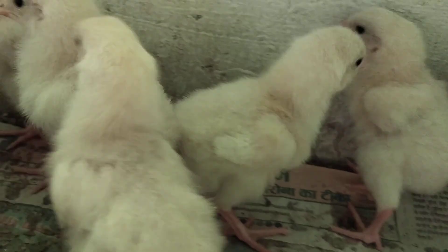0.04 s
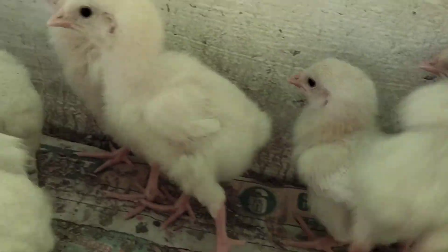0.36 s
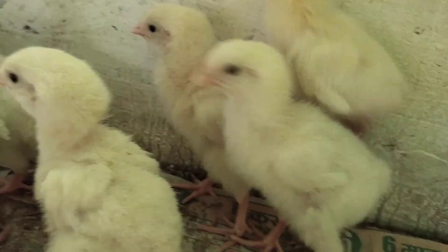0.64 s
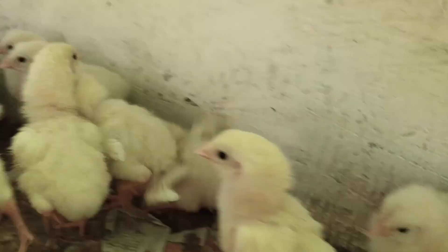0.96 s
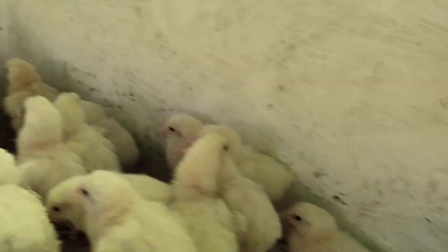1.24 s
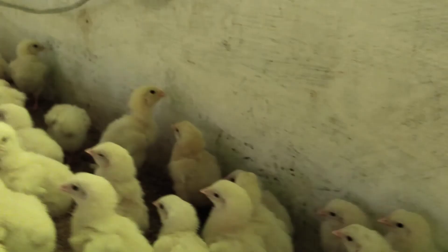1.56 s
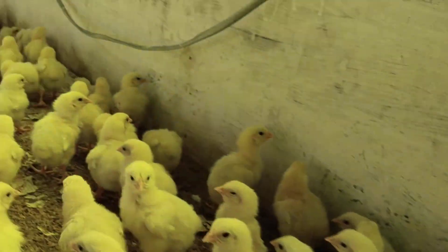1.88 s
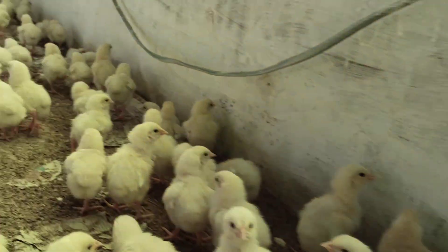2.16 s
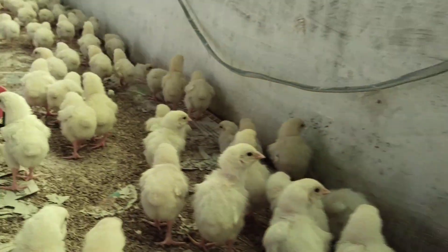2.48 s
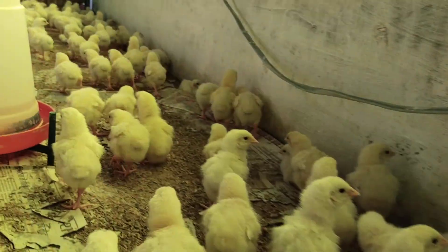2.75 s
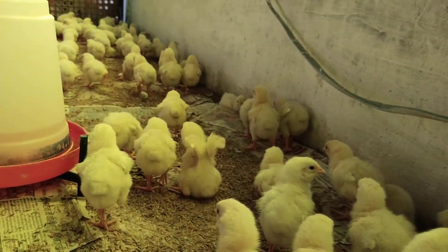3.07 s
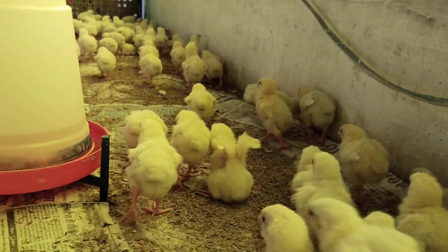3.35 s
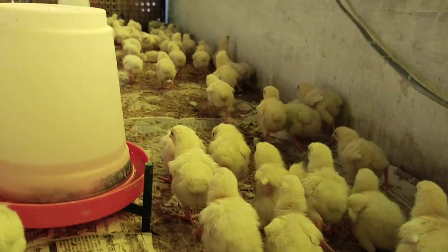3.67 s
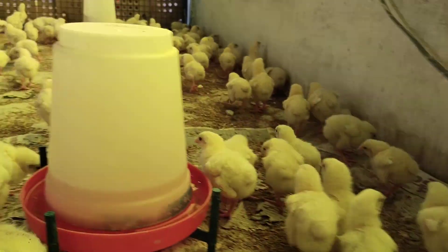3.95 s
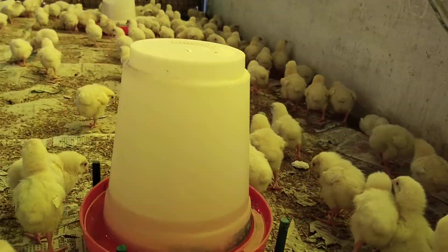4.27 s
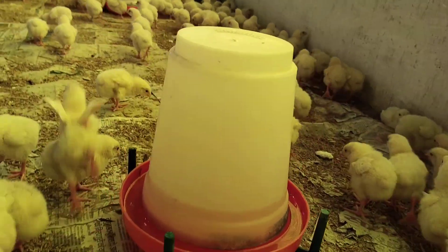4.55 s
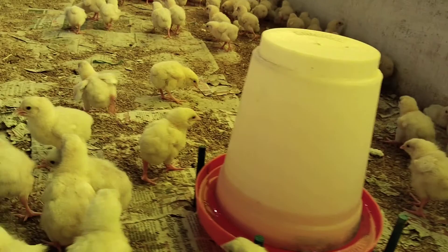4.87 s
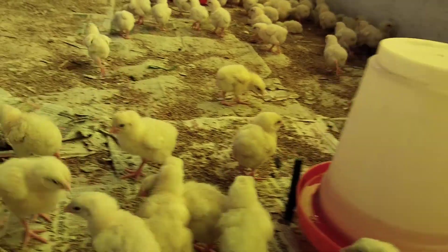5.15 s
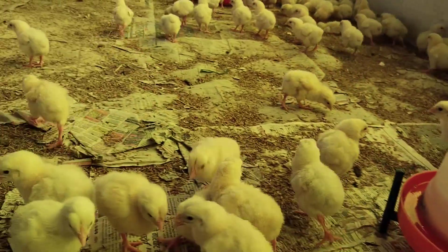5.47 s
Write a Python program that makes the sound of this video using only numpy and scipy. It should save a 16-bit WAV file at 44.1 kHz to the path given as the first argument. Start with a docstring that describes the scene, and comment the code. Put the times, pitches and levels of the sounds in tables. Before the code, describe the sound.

Young chicks call throughout in a concrete shed. The closest birds give high, nearly pure whistles with quick wall echoes, while the rest of the flock blurs into a softer, ringing chorus. From the start to about 1 second, short warbling trills come thick and loudest, mostly to the left. Soft hollow bumps with a muffled crackle cluster between 0.3 and 1.4 seconds and return only faintly later. From 1.5 to 4 seconds the near calls are sparser and a little quieter, mixing trills with falling peeps. At about 3.7 seconds there is one bright swish of paper and feathers, and a soft low rumble lasts half a second. From 4.3 seconds to the end at about 5.5, close falling peeps follow each other quickly, strongest around 4.4 to 4.8. Feet and wings scuffle lightly in litter all along, over a very faint hum.

```python
"""Chicks in a concrete shed

Young chicks call close by in warbling trills and falling peeps, each a nearly pure whistle from the
syrinx, thrown back by floor and walls. Behind them the flock blurs into a ringing chorus.
Feet and wings scuffle in litter and newspaper, with one bright swish. Soft hollow bumps, a brief low
rumble and a faint hum lie underneath."""
import sys
import numpy as np
from scipy import signal
from scipy.fft import rfft, irfft, next_fast_len
from scipy.io import wavfile
from scipy.ndimage import uniform_filter1d, map_coordinates

SR = 44100
rng = np.random.default_rng(int(sys.argv[2]) if len(sys.argv) > 2 else 0)


def generate_wav(sig):
    """Save sig (samples, or channels by samples) to the path in sys.argv[1] as 16-bit PCM at SR."""
    pcm = np.round(np.clip(np.atleast_2d(sig).T, -1, 1) * 32767).astype(np.int16)
    wavfile.write(sys.argv[1], SR, pcm)


N = 243431
TIME = np.arange(N) / SR

# Levels in the tables are relative: each layer adds its own trim.
# Near trills, plus one thin high squeak (the octave overtone of the trill ending there):
# (first dip [s], first to last dip [s], crest pitch [Hz], dip pitch [Hz],
# closing droop [share, negative climbs], level [dB], accent in the dips [dB], left over right [dB])
TRILL_CUES = [(0.058, 0.099, 4545, 3240, 0.034, -23.5, 5.5, 1.5),
              (0.139, 0.074, 4330, 2786, 0.017, -29.5, -0.5, 2.5),
              (0.221, 0.061, 4916, 4020, -0.054, -19.5, 7, 7),
              (0.312, 0.029, 4780, 4180, 0.08, -20, 9.5, 7.5), (0.364, 0.02, 4530, 3710, 0.063, -23, -1, 6),
              (0.41, 0.043, 4650, 3690, 0.11, -28, -5, 2.5),
              (0.607, 0.086, 5475, 4050, 0.015, -26.5, 11.5, 5),
              (0.618, 0.18, 4400, 3177, 0.028, -43.5, 9, -2),
              (0.727, 0.038, 5470, 4520, 0.061, -26.5, 3, 5),
              (0.795, 0.032, 5700, 4080, 0.077, -29.5, 13.5, 9.5),
              (0.826, 0.039, 8300, 7260, 0.064, -59, 26.5, -5.5),
              (0.911, 0.062, 5100, 3900, 0.057, -26, 0, -7.5),
              (0.941, 0.051, 4240, 3426, -0.02, -29.5, 4, 11), (1.006, 0.027, 4930, 3470, 0.079, -23, 8, 8),
              (1.054, 0.037, 4580, 3350, 0.13, -29, 2, 3.5),
              (1.246, 0.09, 4380, 3306, 0.048, -28.5, 5, 8.5),
              (1.359, 0.15, 4850, 4060, 0.095, -36, 5.5, 4.5), (1.584, 0.068, 4610, 3860, 0.15, -34, 9, 12),
              (1.859, .062, 4630, 4070, 0.026, -28, 4.5, 12),
              (2.161, 0.064, 4495, 2977, 0.12, -32, 0.5, -8.5),
              (2.367, 0.064, 4670, 3800, 0.068, -38.5, 6, 7), (2.466, 0.067, 3896, 3450, 0.042, -34, -7, 6),
              (2.685, 0.069, 3500, 2685, 0.099, -38.5, 11.5, -3),
              (2.785, 0.081, 3965, 3255, 0.12, -31, 1.5, 3),
              (3.08, 0.064, 2880, 2467, 0.00067, -31.5, 6, 3.5),
              (3.229, 0.06, 4595, 3380, 0.057, -31.5, -12, 2.5),
              (3.518, 0.1, 4320, 3710, 0.032, -34, 2, 10), (4.022, 0.17, 4875, 4100, 0.012, -43.5, 6, 3),
              (4.298, 0.065, 4494, 3280, 0.061, -32, 4, -8.5)]
# Swell of a near trill: (start [dB], middle [dB], end [dB])
TRILL_SWELL = [0, 1.67, 3]
# Near peeps: (start [s], hold [s], slide [s], held pitch [Hz], target pitch [Hz], level [dB],
# left over right [dB])
PEEP_CUES = [(0.469, 0.025, 0.049, 4725, 4260, -27.5, 10), (1.641, 0.024, 0.094, 4130, 2774, -34.5, -5),
             (2.224, 0.044, 0.068, 4630, 3655, -35.5, 2.5), (2.596, 0.037, 0.0097, 4530, 4350, -28, -7),
             (2.686, 0.055, 0.026, 4630, 4400, -28, 1.5), (3.032, 0.083, 0.067, 4416, 3000, -34.5, -4),
             (3.293, 0.014, 0.023, 4450, 3300, -28.5, -4.5), (3.354, 0.0079, 0.084, 4060, 2666, -34, -13),
             (3.501, 0.11, 0.035, 4720, 2680, -29.5, 3), (3.955, 0.0076, 0.083, 3820, 2720, -34, -10),
             (4.342, 0.011, 0.046, 4080, 3090, -31, 4), (4.415, 0.024, 0.042, 3865, 3090, -24, -3.5),
             (4.517, 0.013, 0.035, 4220, 3380, -31, -13), (4.605, 0.053, 0.023, 4270, 4020, -22.5, 5),
             (4.677, 0.029, 0.042, 3970, 3360, -23, -3), (4.813, 0.044, 0.031, 4340, 2330, -25, -3),
             (4.957, 0.015, 0.074, 3840, 2920, -33.5, -3), (5.07, 0.014, 0.11, 4600, 2610, -34, -6),
             (5.137, 0.038, 0.057, 3880, 2760, -31, -3.5), (5.188, 0.043, 0.07, 4536, 2995, -31, 0.5),
             (5.215, 0.013, 0.037, 4250, 2530, -32, 7), (5.375, 0.011, 0.11, 4385, 2627, -33, -5),
             (5.482, 0.017, 0.033, 4400, 4130, -31, -2.5)]
# Level of the second harmonic by its frequency: (frequency [Hz], level [dB])
OCTAVE_COLOUR = [(6300, -28), (7600, -35), (8700, -21), (9200, -24), (9550, -17), (10800, -36)]
# Fader ride of the far flock: (time [s], level [dB])
CHORUS_RIDE = [(0, -34.5), (1.65, -36), (1.78, -37.5), (2.05, -38), (2.2, -36), (2.85, -34.5),
               (2.95, -36.5), (3.1, -35), (4.2, -35.5), (4.8, -32), (5.52, -36.5)]
# Ring of the shed: (frequency [Hz], time to fall 60 dB [s])
SHED_DECAY = [(200, 0.59), (5000, 0.34), (12000, 0.024)]
# Fader rides of the dull scuffling and of the rustle: (time [s], level [dB])
THUD_RIDE = [(0.0, -47.5), (0.31, -75), (0.44, -56.5), (0.61, -59.5), (0.85, -52.5), (1.06, -54),
             (1.69, -63.5), (3.47, -66.5), (3.84, -65), (5.52, -68.5)]
RUSTLE_RIDE = [(0.0, -51), (0.32, -62.5), (0.55, -45), (0.78, -62), (1.12, -52), (1.89, -59.5),
               (2.6, -50.5), (2.91, -54.5), (3.34, -60.5), (3.63, -48.5), (4.37, -59.5), (4.72, -49.5),
               (5.25, -59), (5.52, -51.5)]
# Colours of the noise layers: (frequency [Hz], level [dB])
THUD_COLOUR = [(30, -57), (60, -11), (125, -4), (330, -8), (1200, -30.5)]
RUSTLE_COLOUR = [(200, -38), (500, -14), (2000, -5), (4500, -7), (7000, -9.5), (9000, -12.5), (11500, -21),
                 (15000, -30.5)]
PATTER_COLOUR = [(200, -6.5), (500, 5), (1800, -2), (4000, -38)]
SWISH_COLOUR = [(2000, -25), (6500, 0), (9000, -3), (15000, -18)]
RUMBLE_COLOUR = [(80, -19), (125, -2), (190, -11), (400, -56)]
WHITE = [(100, 0), (5000, 0)]
# Longer scuffs of feet and wings: (start [s], length [s], band centre [Hz], level [dB])
SCUFF_CUES = [(0.238, 0.15, 274, -44), (0.38, 0.27, 227, -42), (1.074, 0.19, 220, -39.5),
              (1.974, 0.22, 400, -50.5), (2.418, 0.26, 850, -47), (3.653, 0.12, 490, -42.5),
              (3.987, 0.24, 750, -47.5), (4.734, 0.17, 530, -49), (4.68, 0.5, 1530, -53.5),
              (5.29, 0.31, 1340, -51)]
# Soft hollow bumps with a muffled crackle: (time [s], level [dB], crackle offset [dB])
BUMP_CUES = [(0.276, -29.5, -12.5), (0.433, -24.5, 0.5), (0.471, -22.5, -9), (0.571, -24, -1),
             (0.762, -22.5, -10), (0.946, -29, -3.5), (1.046, -32.5, -5), (1.105, -28.5, 1),
             (1.17, -23.5, -9), (1.416, -30, 0.5), (2.579, -33.5, 3), (3.239, -42.5, 6.5),
             (4.488, -40.5, 6), (4.803, -38, 7), (5.363, -33.5, 8.5)]
# Resonances of the bumps: (frequency [Hz], level [dB])
BUMP_MODES = [(128, -4.5), (215, -5), (340, 3), (530, 2)]


def near_chicks(trill_db=-1.5, peep_db=-2.0, rise=0.0457, dip_droop_ratio=1.28, fade_db_per_droop=28):
    """The closest birds, each call distinct; a trill rises and swells, and fades as far as it droops."""
    out = np.zeros((2, N))
    for first_dip, length, crest_hz, dip_hz, droop, db, accent_db, pan_db in TRILL_CUES:
        crests = crest_hz * np.array([1 - rise, 1, 1 - droop])
        dips = dip_hz * np.array([1, 1, 1 - dip_droop_ratio * droop])
        fade_db = fade_db_per_droop * droop * np.array([-.5, 0, 1])
        levels = db + trill_db + np.array(TRILL_SWELL) - fade_db
        start, call = trill(first_dip, length, crests, dips, levels, accent_db, pan_db)
        add(out, start, wall_echoes(call, db + max(accent_db, 0)))
    for start, hold, slide, top_hz, end_hz, db, pan_db in PEEP_CUES:
        call = peep(hold, slide, top_hz, end_hz, db + peep_db, pan_db)
        add(out, start, wall_echoes(call, db))
    return shed_reverb(out, tail_db=-18.5)


def trill(first_dip, length, crests_hz, dips_hz, levels_db, accent_db, pan_db, swing_hz=33):
    """The pitch swings in round arches with sharp dips, no two alike; returns (start [s], sound)."""
    lead_in, run_out = 0.93, 0.16  # in swings
    swings = max(round(length * swing_hz), 1)
    period = length / swings
    cycle = np.arange(-lead_in, swings + run_out, 1 / (period * SR))
    sway, reach, push = [wobble(swing_hz, len(cycle)) for _ in range(3)]
    dip = np.cos(np.pi * (cycle + .025 * sway)) ** 4
    crest_hz = arc(crests_hz, (cycle + .5) / swings) * (1 + .012 * push)
    dip_hz = arc(dips_hz, cycle / swings) * (1 + .035 * reach)
    hz = crest_hz * (1 - dip) + dip_hz * dip
    # the voice bursts out just before each dip and eases off after it, harder in some swings
    past_dip = (cycle + .5) % 1 - .5
    burst = ramp(np.minimum((past_dip + .16) / .04, (.28 - past_dip) / .2))
    burst *= 1 + .15 * np.tanh(push)
    gate = ramp(np.minimum((cycle - cycle[0]) / .6, (cycle[-1] - cycle) / .15))
    gain = gate * amp(arc(levels_db, cycle / swings) + accent_db * burst)
    return first_dip - lead_in * period, whistle(hz, gain, pan_db)


def peep(hold, slide, top_hz, end_hz, level_db, pan_db, attack_s=0.013, release_s=0.014, push_db=4.5):
    """One whistle scoops up to its pitch, holds it, then quavers and pushes harder as it slides down."""
    length = hold + slide
    t = np.arange(int(length * SR)) / SR
    fall = uniform_filter1d(ramp((t - hold) / slide), int(0.016 * SR), mode="nearest")  # rounded bend
    scoop = 1 - 0.1305 * np.exp(-t / 0.00787)
    quaver = np.sqrt(np.abs(fall)) * wobble(66, len(t))
    hz = top_hz * (end_hz / top_hz) ** fall * scoop * (1 - .018 * quaver)
    gate = ramp(t / attack_s) * ramp((length - t) / release_s)
    return whistle(hz, gate * amp(level_db + push_db * fall + 2.5 * quaver), pan_db)


def whistle(hz, gain, pan_db, waver=.005, flutter_db=1.6, pure_above_db=-31):
    """The syrinx gives a nearly pure tone that reaches the nearer channel louder and sooner."""
    size = len(hz)
    sides = np.array([[1], [-1]])
    jitter = waver * (wobble(528, size) + 2 * wobble(55, size))
    lead_s = 55e-6 * (np.tanh(pan_db / 4) + rng.normal() / 5)
    phase = 2 * np.pi * np.cumsum(hz * (1 + jitter)) / SR + np.pi * hz * lead_s * sides
    # the faint octave leans right and recedes in strong calls
    purity_db = .65 * max(20 * np.log10(gain.mean()) - pure_above_db, 0)
    octave_db = along(OCTAVE_COLOUR, 2 * hz) - purity_db + 3 * (wobble(75, size) - sides)
    tone = np.sin(phase) * unit(amp(sides * pan_db / 2)) + amp(octave_db) * np.sin(2 * phase)
    low_note_db = along([(2650, -8), (3150, 0)], hz)  # the voice weakens at the bottom of its range
    return tone * gain * amp(low_note_db + flutter_db * wobble(163, size))


def far_flock(calls=200, top_hz=3950, end_hz=2780, spread_db=6.0, trill_share=.25, trim_db=-3.5):
    """The rest of the flock calls at random, each bird with its own pitch, distance and side."""
    out = np.zeros((2, N))
    times = (np.arange(calls) + rng.uniform(-0.92, 1, calls)) / calls * N / SR
    trilling = rng.random(calls) < trill_share
    birds = rng.standard_normal((calls, 5))
    for time, is_trill, (high, low, long, loud, side) in zip(times, trilling, birds):
        top, end = top_hz * np.exp(.14 * np.tanh(high)), end_hz * np.exp(.11 * np.tanh(low))
        length = .06 * np.exp(.35 * np.tanh(long))
        db, pan_db = spread_db * np.tanh(loud), 4 * side
        if is_trill:
            add(out, *trill(time, length, [top], [end], [db], accent_db=12.7, pan_db=pan_db))
        else:
            add(out, time - length / 2, peep(0.014, length, top, end, db, pan_db))
    return amp(ride(CHORUS_RIDE) + trim_db) * unit(shed_reverb(out, tail_db=-4.5))


def wall_echoes(call, level_db, count=6, echo_db=-8.5, reference_db=-27, latest_s=.022):
    """Floor and walls throw back quick copies; fainter, farther birds are blurred more."""
    wet = amp(echo_db + .45 * (reference_db - level_db))
    paths = np.zeros((2, int(latest_s * SR)))
    for channel in paths:
        echoes = wet * rng.choice([-1, 1], size=count) / np.sqrt(count)
        channel[rng.integers(SR // 1000, len(channel), size=count)] = echoes
    paths[:, 0] = 1  # direct sound
    return signal.fftconvolve(call, paths, axes=1) / np.hypot(1, wet)


def shed_reverb(x, tail_db):
    """The concrete shed adds a diffuse ring whose treble dies first."""
    hz, t, spectrum = signal.stft(rng.standard_normal((2, SR // 2)), SR, nperseg=256)
    decay = amp(-60 * t / along(SHED_DECAY, hz)[:, None])
    tail = signal.istft(spectrum * decay, SR, nperseg=256)[1]
    tail *= amp(tail_db) / np.linalg.norm(tail[0])
    return x + signal.fftconvolve(x, tail, axes=1)[:, :N]


def litter(thud_db=3.5, rustle_db=4, patter_db=-4.0):
    """Scuffling on husks and newspaper: hollow thuds, with dry patter and rustle in small surges."""
    thuds = amp(thud_db) * noise(THUD_COLOUR, side_db=-14, grain_db=4.5, grain_hz=70)
    patter = amp(patter_db) * noise(PATTER_COLOUR, side_db=-2.5, grain_db=7.5, grain_hz=130)
    rustle = amp(rustle_db) * noise(RUSTLE_COLOUR, side_db=1.0, grain_db=2.5, grain_hz=330)
    surge_db = 3 * wobble(18, N)
    return amp(ride(THUD_RIDE)) * thuds + amp(ride(RUSTLE_RIDE) + surge_db) * (rustle + patter)


def scuffs(width_octaves=0.67):
    """A foot or wing rubs the litter: one band of grainy noise swells and dies away."""
    out = np.zeros((2, N))
    grains = noise(WHITE, side_db=-4.5, grain_db=3.5, grain_hz=110)
    for start, length, centre_hz, db in SCUFF_CUES:
        rub = np.roll(grains, -round(start * SR), axis=1)[:, :int(length * SR)]
        rub = filtered(rub, lambda hz: np.exp(-.5 * (np.log2((hz + 1) / centre_hz) / width_octaves) ** 2))
        swell = np.sin(np.linspace(0, np.pi, rub.shape[1]))
        add(out, start, amp(db) * unit(rub) * swell)
    return out


def bumps(thud_db=-9, crackle_db=-1, ring_cycles=15, attack_s=.0015, crackle_t60=.05):
    """Soft hollow bumps, each ringing briefly at a slightly different pitch, with a muffled crackle."""
    thuds, crackle_gain = np.zeros((2, 2, N))
    t = np.arange(SR // 4) / SR
    attack = 1 - np.exp(-t / attack_s)
    for start, db, offset_db in BUMP_CUES:
        ring = np.zeros_like(t)
        for k, (mode_hz, mode_db) in enumerate(BUMP_MODES):
            hz = mode_hz * np.exp(rng.normal() / 10)
            ring += (-1) ** k * amp(mode_db - 60 * t * hz / ring_cycles) * np.sin(2 * np.pi * hz * t)
        add(thuds, start, amp(db + thud_db) * (attack * ring)[None])
        add(crackle_gain, start, (amp(db + offset_db - 60 * t / crackle_t60) * attack)[None])
    grit = noise(RUSTLE_COLOUR, side_db=-8.0, grain_db=3.5, grain_hz=900)
    muffled = filtered(grit, lambda hz: 1 / (1 + (hz / 3800) ** 2))
    return thuds + amp(crackle_db) * crackle_gain * muffled


def swish(start_s=3.66, db=-38, attack_s=.012, t60=0.7):
    """One brisk, bright rustle of paper and feathers."""
    t = np.maximum(TIME - start_s, 0)
    attack = 1 - np.exp(-t / attack_s)
    return amp(db - 60 * t / t60) * attack * noise(SWISH_COLOUR, side_db=-1, grain_db=3, grain_hz=500)


def rumble(start_s=3.68, end_s=4.17, fade_s=0.017, db=-52):
    """A soft, low rumble comes in for half a second."""
    gate = ramp(np.minimum(TIME - start_s, end_s - TIME) / fade_s)
    return amp(db) * gate * noise(RUMBLE_COLOUR, side_db=-14, grain_db=4.5, grain_hz=17)


def hum(hz=124, db=-69):
    """A faint, unsteady hum in the building."""
    gain = amp(db + 4.5 * wobble(14, N))
    return gain * unit(np.sin(2 * np.pi * hz * TIME + 1.6 * wobble(25, N)))


def noise(colour, side_db, grain_db, grain_hz):
    """Coloured stereo noise of rms 1, clumped into grains; side_db sets its width."""
    mid, side = rng.standard_normal((2, N)) * amp([[0], [side_db]]) * amp(grain_db * wobble(grain_hz, N))
    return unit(filtered(np.array([mid + side, mid - side]), lambda hz: amp(along(colour, hz))))


def amp(db):
    """Decibels to gain."""
    return 10 ** (np.asarray(db) / 20)


def unit(x):
    """Scale to rms 1."""
    return x / np.sqrt(np.mean(x ** 2) + 1e-20)


def ramp(x):
    """Hold x between 0 and 1."""
    return np.clip(x, 0, 1)


def along(points, hz):
    """Read (frequency [Hz], value) points on a log axis."""
    frequencies, values = np.transpose(points)
    return np.interp(np.log(hz + 1), np.log(frequencies + 1), values)


def ride(points):
    """A fader move through (time [s], level [dB]) points, one level per sample."""
    return np.interp(TIME, *np.transpose(points))


def arc(values, progress):
    """A smooth curve through evenly spaced values, for progress from 0 to 1."""
    curve = np.polyfit(np.linspace(0, 1, len(values)), values, len(values) - 1)
    return np.polyval(curve, ramp(progress))


def wobble(rate, size):
    """A smooth random curve with rate knots a second."""
    knots = rng.standard_normal(int(size * rate / SR + 4))
    return map_coordinates(knots, [np.arange(size) * rate / SR])


def filtered(x, response):
    """Equalise x with a gain that is a function of frequency."""
    size = x.shape[-1]
    padded = next_fast_len(size + 4096)
    return irfft(rfft(x, padded) * response(np.fft.rfftfreq(padded, 1 / SR)), padded)[..., :size]


def add(track, start_s, x):
    """Mix x into the stereo track from start_s on."""
    i = round(start_s * SR)
    lo, hi = max(i, 0), min(i + x.shape[1], N)
    if hi > lo:
        track[:, lo:hi] += x[:, lo - i:hi - i]


def scene():
    """Near birds over the chorus, a bed of scuffles and bumps leaning slightly left, and the hum."""
    bed = litter() + scuffs() + bumps() + swish() + rumble()
    return near_chicks() + far_flock() + bed * amp([[.7], [-.7]]) + hum()


def record(dry):
    """The microphone rolls off the deep bass and cuts the very top."""
    bass_hz, top_hz = 60, 15500
    return filtered(dry, lambda hz: (hz < top_hz) * hz ** 2 / (hz ** 2 + bass_hz ** 2))


dry = scene()
out = record(dry)
generate_wav(out)
```